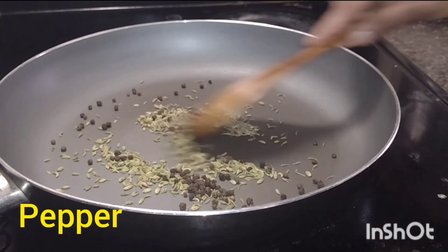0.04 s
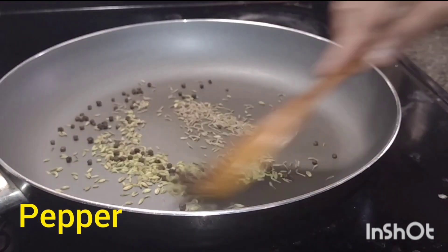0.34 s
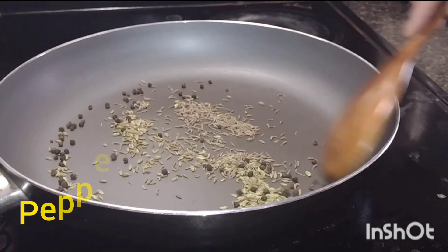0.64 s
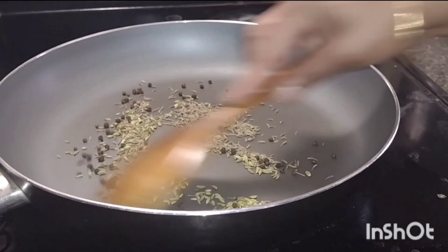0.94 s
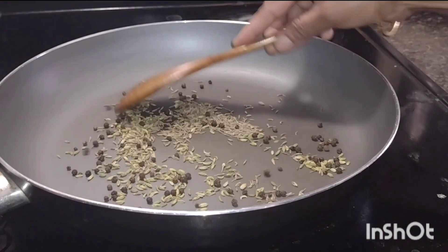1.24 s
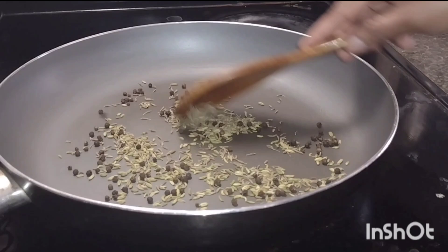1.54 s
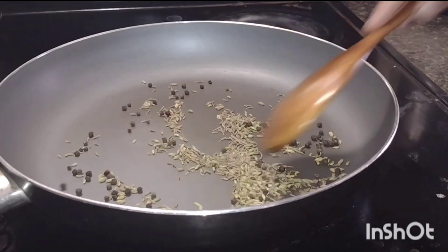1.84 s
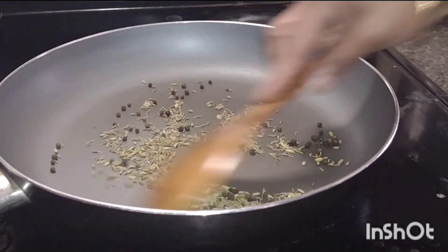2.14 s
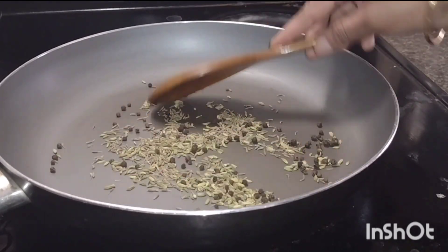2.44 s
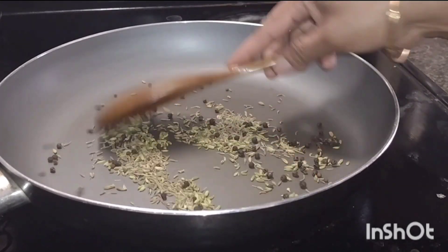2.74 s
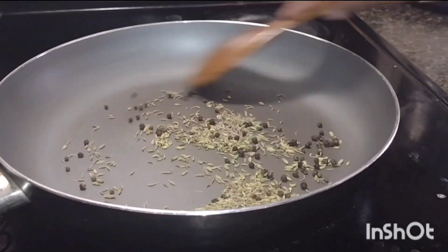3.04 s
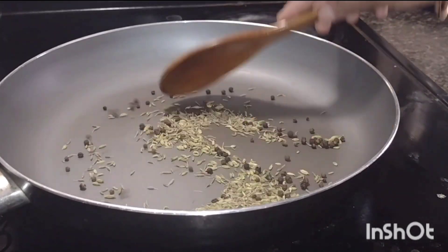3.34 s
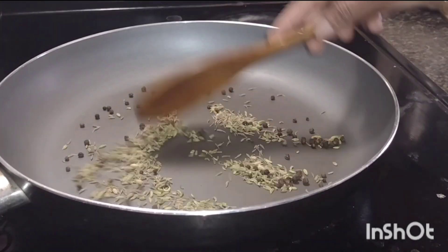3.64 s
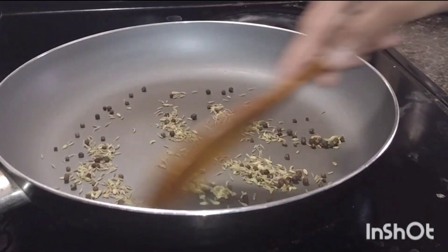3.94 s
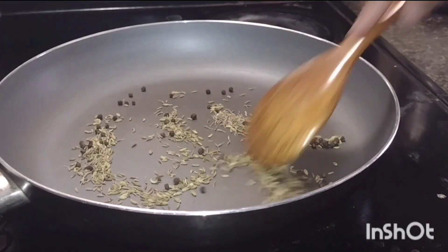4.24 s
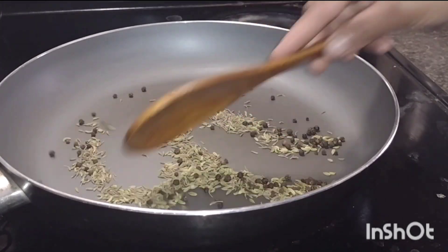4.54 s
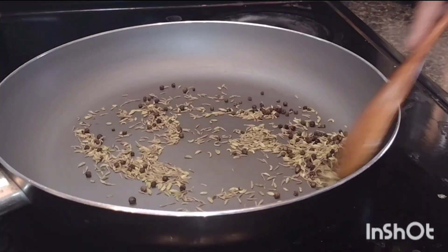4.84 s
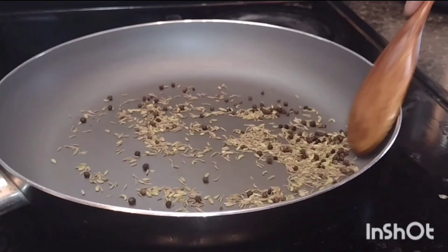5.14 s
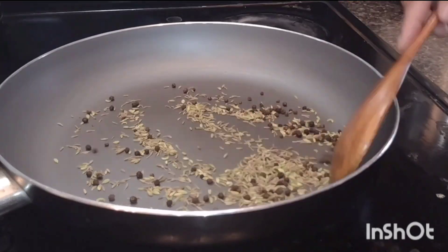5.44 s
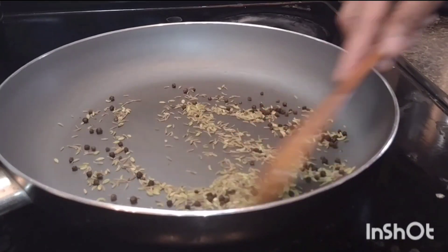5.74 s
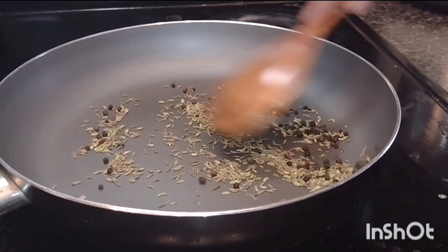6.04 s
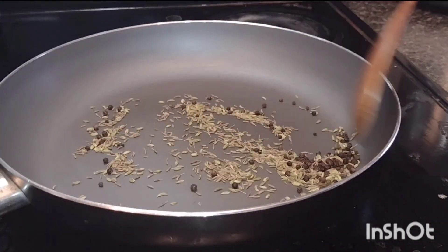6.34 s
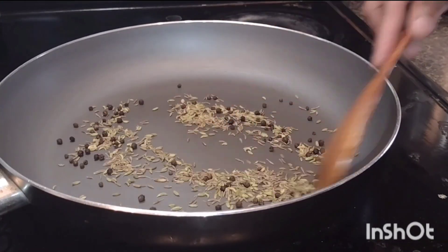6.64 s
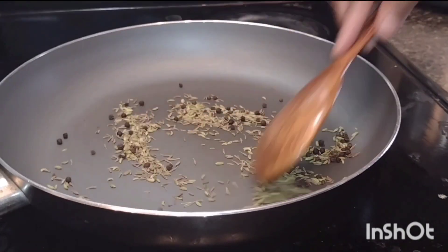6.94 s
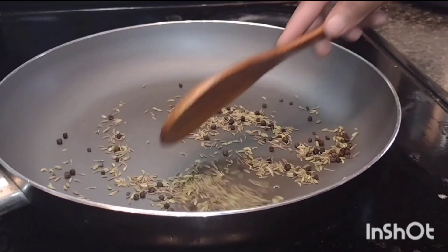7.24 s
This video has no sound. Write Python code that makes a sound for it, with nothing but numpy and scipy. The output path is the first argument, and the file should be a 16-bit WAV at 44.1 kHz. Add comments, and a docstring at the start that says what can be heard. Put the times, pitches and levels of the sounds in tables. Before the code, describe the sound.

A wooden spoon stirs dry seeds and peppercorns around a non-stick frying pan. Quick, uneven strokes rub and scrape the base, mixed with dull knocks, while the seeds hiss and rattle and the peppercorns tick on the metal. The stirring continues throughout, and near the end the pan shifts slightly and takes its loudest knock. It sounds close, in a small kitchen with a faint hum.

```python
"""A small, faintly humming kitchen, where a wooden spoon stirs dry seeds and peppercorns in a non-stick pan.
Each impact of the spoon excites the pan's damped modes in a dull knock. Stick-slip friction makes it rub, and
the air cavity under its bowl adds a sinking resonance. The seeds hiss by countless small collisions,
peppercorns tick on the metal, and now and then the pan rocks on the hob. The sound drops out briefly near 4.8 s
and fades at the end."""
import sys
import numpy as np
from scipy import signal
from scipy.fft import rfft, irfft, next_fast_len
from scipy.io import wavfile
from scipy.ndimage import uniform_filter1d, map_coordinates

SR = 44100
rng = np.random.default_rng(int(sys.argv[2]) if len(sys.argv) > 2 else 0)


def master(y):
    """Save y as 16-bit WAV."""
    cut = np.clip(np.atleast_2d(y).T, -1, 1)
    pcm = np.round(cut * 32767)  # scale
    wavfile.write(sys.argv[1], SR, pcm.astype(np.int16))


N = 326340

# Levels in the tables are relative: each source adds its own gain.
# Spectrum of the still air. Each row: frequency in Hz, spectral density in dB.
AIR_SPECTRUM = [(15, -33), (25, 3.5), (253, 15), (631, 11), (1050, -6.5), (1450, 6), (1800, 7),
                (2630, -0.5), (3340, 1), (9050, -17.5), (15500, -24)]
# Impacts of the spoon. Each row: start in seconds, level in dB, hardness from 0 to 1, relative thud in dB,
# left over right in dB, pitch of the struck spot in Hz, chatter time in seconds, place from -1 (wall)
# to 1 (middle of the base).
SPOON_KNOCKS = [(0.012, -31, 0.68, -23, -1.5, 1780, 0.0057, 0.32),
                (.218, -34, 1, -16, 3, 2300, 0.012, -0.2), (.263, -47, 0.6, -10, 0, 900, .004, -0.17),
                (0.337, -40.5, 0.34, -4, -1, 1000, 0.011, 0),
                (0.4089, -30.5, 0.99, -13.5, 1, 2460, 0.0013, 0.15),
                (0.704, -30.5, 0.87, -14, -1, 2040, 0.0048, -0.45),
                (0.892, -36.5, 0.08, -4, -2, 900, 0.0062, 0.25),
                (.941, -35, 0.95, -14, 3, 2330, 0.0019, -0.05),
                (1.1239, -21.5, 0.68, -17, 1, 1940, 0.011, 0.5),
                (1.1724, -29.5, 0.85, -18, 3, 1920, 0.0068, -0.21),
                (1.221, -32.5, 0.97, -16, 0, 2340, 0.0049, -0.18),
                (1.423, -37.5, 0.8, -6.5, 1, 2380, 0.0079, -0.19),
                (1.5657, -19.5, 0.66, -20.5, 1.5, 750, 0.016, 0.91),
                (1.738, -41.5, 0.42, -6, -1, 955, .005, -0.036),
                (2.003, -40.5, 0.2, -18, 2, 820, 0.007, 0.36),
                (2.124, -35.5, 0.56, -8.5, -0.5, 1650, 0.002, -0.26),
                (2.296, -29.5, 0.89, -13, -1, 2250, 0.0084, -0.19),
                (2.3277, -32.5, 0.82, -14, -1.5, 2060, .003, -0.86),
                (2.471, -25.5, 0.64, -19, -1, 774, 0.018, 1), (2.541, -33, 0.95, -15, -2, 2380, 0.0027, 0),
                (2.676, -36, 0.8, -9, -1, 2080, 0.0039, -0.24),
                (2.959, -38.5, 1, -12, 1, 2460, 0.0069, 0.67),
                (2.993, -27, 0.75, -11.5, 2.5, 1930, 0.0091, -0.79),
                (3.097, -31.5, 0.48, -17, -1, 1060, 0.0052, -0.63),
                (3.256, -32.5, 0.63, -13, 3.5, 2630, 0.013, 0.16),
                (3.416, -33, 0.18, -21, 3, 760, 0.011, 0.73),
                (3.446, -30.5, 0.4, -17, -1, 675, 0.0024, 0.31),
                (3.5894, -29, 0.7, -11.5, -1.5, 2030, 0.0074, -0.56),
                (3.7758, -30, 0.26, -12, 0, 800, 0.0017, 0.51),
                (3.9351, -25.5, 0.86, -13, 0.5, 2070, 0.011, -0.55),
                (4.122, -37, 0, -6.5, 2, 870, .002, -0.1), (4.3669, -26, 0.43, -14, -0.5, 816, 0.013, 0.79),
                (4.508, -36, 0.06, -15, -2, 760, 0.008, -0.072),
                (4.608, -43, 0.34, -11, 1, 1090, 0.0054, 0),
                (4.6989, -35.5, 0.82, -12.5, 3, 2030, 0.013, -0.56),
                (4.758, -36.5, 0.73, -22, 3, 2000, 0.0055, -1),
                (4.891, -34.5, 0.83, -9, -2, 2300, 0.011, 0.87),
                (5.213, -26.5, 1, -17, 1.5, 2370, 0.0022, -0.77),
                (5.256, -29.5, 0.75, -33, -4.5, 1800, .01, 0.47),
                (5.305, -31, 0.97, -14, 3.5, 2290, 0.0027, -0.081),
                (5.313, -38.5, 0.35, -13, 0, 910, 0.0038, 0),
                (5.37, -26.5, 0.36, -13, -1, 1004, 0.0018, 0.69),
                (5.783, -29.5, 1, -14, 0, 1890, 0.0091, -0.76),
                (6.074, -25.5, 0.92, -36, 1, 805, 0.0075, 0.22),
                (6.174, -30.5, 1, -10, -1, 1110, 0.021, -0.54),
                (6.411, -32, 0.71, -6.5, -0.5, 1020, 0.014, -0.7), (6.482, -28, 0, -18, 0, 780, .011, 0.24),
                (6.579, -14.5, 0.71, -17, -0.5, 1036, 0.0088, 0.57),
                (6.619, -32, 0.6, -13, 1, 1120, 0.0059, -0.18),
                (6.63, -35.5, 0.45, -19, -4, 1020, 0.0044, 0),
                (6.7, -29.5, 0.57, -8.5, 0.5, 2020, 0.0029, 0.68),
                (7.066, -33.5, 0.97, -10, 1, 2110, 0.015, -0.41)]
# Normal modes of the pan. Each row: frequency in Hz, level in dB, t60 in seconds at a damping of 1,
# lift in dB when struck in the middle, lift in dB when struck on the wall.
PAN_MODES = [(254.6, -5.5, 0.077, -2, 0), (317.5, -7, 0.096, 11.5, 12), (465, -3, 0.037, -5.5, 1.5),
             (780, 5, 0.045, 14, 1), (951, 8.5, 0.021, -5.5, 5.5), (1102, 1.5, 0.039, 11.5, 7),
             (1267, -2.5, 0.077, -2, 5), (1796, 2.5, 0.073, 20.5, 6.5), (1961, 5.5, 0.031, 0, 2),
             (2190, 1, 0.049, 3, 6.5), (2413, 2.5, 0.029, -3.5, 5.5), (2571, 0, 0.041, 22, 5.5),
             (2904, 2, 0.0094, 3, 17), (3660, -11, 0.17, 9, 9.5), (4184, -9, 0.097, 10, 18.5),
             (4400, -40, 0.047, 5, -1.5), (4730, -9.5, 0.15, 2.5, 22), (5430, 1.5, 0.037, 3.5, 7),
             (5500, -11.5, 0.088, 10.5, 1), (6470, -20.5, 0.034, -4, 1.5), (6506, -2.5, 0.04, 0, 12.5),
             (7300, -1, 0.079, 5, 4), (8230, -7, 0.098, 6, 10), (8750, -5, 0.044, 4.5, -4),
             (9280, 2, 0.054, 3, 5), (12400, -22, 0.028, -2, -10)]
# Colour that the wood gives a blow. Each row: frequency in Hz, gain in dB.
WOOD_SPECTRUM = [(400, -3.5), (650, -0.5), (1150, 1.5), (2000, 6.5), (2800, 6.5), (4000, 4), (7000, 1),
                 (15000, -16)]
# Nearly flat slides. Each row: start in seconds, length in seconds, level in dB, pitch halfway in Hz.
FLAT_GLIDES = [(.025, 0.079, -45.5, 850), (0.956, 0.12, -47.5, 1021), (3.061, .11, -46.5, 1065),
               (4.193, 0.092, -46.5, 1063), (6.217, 0.098, -37.5, 1020)]
# Strokes of the spoon. Each row: start in seconds, length in seconds, pressing level in dB,
# rubbing level in dB, growth over the stroke in dB, cavity pitch halfway in Hz.
SPOON_STROKES = [(0.031, 0.055, -66, -41, 8, 890), (0.125, 0.079, -63.5, -64, -4, 2070),
                 (0.204, 0.066, -58.5, -45.5, 10.5, 1750), (0.34, 0.23, -56, -45.5, -6, 2360),
                 (0.565, 0.036, -63, -37, 4, 1130), (0.703, 0.11, -56.5, -42.5, 3, 2050),
                 (0.931, 0.11, -65, -42, -1, 1130), (1.135, 0.14, -53, -46.5, -19, 1730),
                 (1.291, 0.074, -55.5, -44, 3, 1960), (1.399, 0.074, -61, -48.5, 8, 2090),
                 (1.575, 0.047, -55, -43, -4, 750), (1.788, 0.073, -56, -40, -1.5, 1150),
                 (1.976, 0.021, -60, -53, -8, 810), (2.149, .11, -58, -42, -0.5, 2130),
                 (2.334, 0.049, -53.5, -42, -10, 2110), (2.502, 0.079, -58, -38.5, 1, 2000),
                 (2.66, 0.057, -59.5, -49, -6, 1870), (2.789, 0.085, -59.5, -42.5, 8, 860),
                 (2.991, 0.19, -55.5, -39, 0.5, 1140), (3.275, 0.14, -54.5, -43.5, -12.5, 1770),
                 (3.45, 0.088, -59.5, -40, -4, 795), (3.589, 0.075, -49.5, -39.5, -6, 810),
                 (3.769, 0.069, -59, -46.5, 1, 830), (3.946, 0.087, -52.5, -42, -5, 830),
                 (4.143, 0.12, -57.5, -39.5, 3, 1130), (4.369, 0.077, -61, -50.5, -20, 780),
                 (4.492, 0.069, -57.5, -47, 10, 1450), (4.676, 0.071, -59.5, -48.5, 2, 1580),
                 (4.895, 0.13, -50.5, -40.5, -15, 880), (5.043, 0.12, -50.5, -39.5, -7, 1660),
                 (5.215, 0.14, -57, -45.5, -15, 1730), (5.385, 0.049, -59, -38.5, 7, 2000),
                 (5.482, 0.098, -61, -49, 6, 1080), (5.66, 0.067, -53.5, -37, -8.5, 1890),
                 (5.799, 0.14, -59.5, -49, -23.5, 1800), (5.963, 0.17, -58, -45.5, -2, 870),
                 (6.217, 0.089, -60, -37, 5, 1010), (6.385, 0.18, -50, -44.5, 1, 764),
                 (6.584, 0.03, -54, -39.5, 9.5, 770), (6.74, 0.027, -58, -39.5, -1, 805),
                 (6.834, 0.025, -49, -43, 3.5, 1120), (6.911, 0.12, -64, -46, -14, 1090),
                 (7.07, 0.12, -60, -48.5, -4, 1110), (7.244, 0.038, -63, -45.5, -9, 1770)]
# Spectra of pressing, of rubbing and of a seed's snap. Each row: frequency in Hz, gain in dB.
PRESS_SPECTRUM = [(30, -35), (70, -2), (130, -7), (280, 3.5), (500, 4), (700, -20), (1200, -80.5)]
RUB_SPECTRUM = [(300, -32.5), (550, -9.5), (750, 3), (1100, 2.5), (1500, -4), (2100, 3.5), (2800, -3.5),
                (3500, -19.5), (6000, -45.5)]
CRUNCH_SPECTRUM = [(400, -31), (1200, 7), (2300, 2.5), (4000, 3.5), (8000, -7.5), (15000, -27.5)]
# Waves of swept seeds. Each row: start in seconds, length in seconds, fine spray in dB,
# skitter on the metal in dB, growth over the wave in dB.
SEED_WAVES = [(0.047, 0.073, -58, -53, -12), (0.12, 0.084, -60, -61, -4), (0.212, 0.053, -60, -54, -5),
              (0.364, 0.095, -48.5, -54, 4), (0.544, 0.093, -48, -47, -0.5), (0.655, 0.032, -56.5, -60, 2),
              (0.729, 0.066, -52, -50.5, 4.5), (0.825, 0.044, -74, -61, 9), (0.912, .14, -50, -54.5, 12),
              (1.122, 0.088, -55, -52, -2.5), (1.263, 0.013, -62, -58, 4), (1.303, 0.057, -53, -53, 6.5),
              (1.446, 0.06, -61.5, -54, -6), (1.56, 0.057, -61.5, -57, -3), (1.782, 0.093, -52, -51, -9),
              (1.99, 0.087, -60, -58.5, -16), (2.164, 0.099, -50.5, -49, -5.5),
              (2.346, 0.055, -65.5, -58, -2), (2.5, 0.04, -67, -55, -5), (2.625, 0.0092, -57, -58, 1),
              (2.682, 0.058, -63.5, -58, 0), (2.789, 0.057, -50.5, -62, 13), (3.022, 0.092, -49.5, -47, 10),
              (3.15, 0.02, -59.5, -50, 6), (3.274, 0.048, -59.5, -51, 8.5), (3.443, 0.033, -59.5, -60, -2),
              (3.6, 0.069, -65.5, -64, 4), (3.796, 0.04, -60, -62, 12), (3.983, 0.063, -59.5, -63, 7),
              (4.16, 0.13, -54, -61, 6.5), (4.359, 0.072, -54, -58, -10.5), (4.508, 0.057, -55.5, -63, 3),
              (4.871, 0.21, -70.5, -61, 8), (5.055, 0.087, -49, -43, 15), (5.22, 0.067, -50.5, -46.5, -2),
              (5.3, 0.037, -56, -60, -4), (5.377, 0.048, -50.5, -44.5, 0), (5.475, 0.028, -59, -61, -3),
              (5.531, 0.057, -55, -49, -2), (5.669, 0.03, -48, -42.5, 7), (5.793, 0.099, -53, -60, -2),
              (5.981, 0.095, -43.5, -40, 4), (6.097, 0.034, -69, -57, -9), (6.208, 0.029, -65.5, -48.5, 7),
              (6.258, .095, -49, -44, -10.5), (6.452, 0.12, -53, -51, -3), (6.584, 0.044, -51, -42, 5),
              (6.718, 0.079, -54, -51, -3), (6.9, 0.085, -45, -43.5, 0), (7.002, 0.022, -55, -62, -1),
              (7.071, 0.069, -59, -56, -3.5), (7.243, 0.052, -53.5, -52, -4)]
# Spectra of seeds on metal and of seeds on seeds. Each row: frequency in Hz, gain in dB.
SKITTER_SPECTRUM = [(1200, -17), (2800, -7.5), (4200, 3), (5200, -4.5), (6500, 0.5), (8000, -13.5),
                    (14000, -16.5)]
SPRAY_SPECTRUM = [(3000, -20.5), (5500, -4.5), (6800, 2.5), (9200, 0), (11000, -1.5), (13500, -5.5),
                  (16000, -20)]
# Peppercorns hitting the metal. Each row: start in seconds, level in dB, pitch in Hz.
PEPPERCORN_TICKS = [(0.068, -38, 1880), (0.0872, -34, 2500), (0.1046, -33, 2400), (0.153, -37, 2600),
                    (.169, -43, 2400), (0.1899, -31.5, 2290), (.2549, -32.5, 2370), (0.3116, -36, 2380),
                    (.32, -38, 2000), (0.4543, -37, 2480), (.466, -41, 2400), (0.4975, -35.5, 2380),
                    (0.5654, -35, 1800), (.6759, -36.5, 2030), (0.7908, -28.5, 2250), (.8251, -39, 2470),
                    (0.858, -36.5, 2280), (1.0992, -29, 2040), (1.3145, -33.5, 2100), (1.323, -41, 2300),
                    (1.3527, -26.5, 1970), (1.386, -29, 1960), (1.394, -31.5, 2240), (1.475, -34, 1830),
                    (1.5464, -31, 1860), (1.6209, -25, 2150), (1.652, -32.5, 2150), (1.709, -35, 1810),
                    (1.77, -43, 2500), (1.7915, -36, 2600), (1.8628, -32.5, 1740), (1.937, -48, 2400),
                    (1.971, -50, 2400), (2.0556, -43, 2270), (2.138, -35.5, 2600), (2.214, -32, 2380),
                    (2.247, -27, 2440), (2.255, -28, 1860), (2.269, -47, 2400), (2.341, -34, 2390),
                    (2.534, -33, 2400), (2.576, -31, 2170), (2.619, -42, 2420), (2.7263, -42, 2430),
                    (2.7758, -38, 2460), (2.795, -40, 2400), (2.8846, -40, 2300), (3.1112, -32, 2500),
                    (3.1693, -33, 2200), (3.2066, -39, 2270), (3.251, -34, 2520), (3.3284, -51, 2500),
                    (3.3575, -36, 2580), (3.394, -38.5, 2380), (3.436, -29.5, 2480), (3.4893, -30.5, 2040),
                    (3.521, -37, 2240), (3.603, -30, 2180), (3.6621, -28, 2140), (3.803, -42, 2280),
                    (3.892, -42, 2870), (3.909, -34, 2360), (3.915, -36, 1500), (4.007, -44, 2300),
                    (4.145, -33.5, 2460), (4.517, -42, 2280), (4.5585, -37, 2400), (4.567, -35, 2180),
                    (4.6029, -32.5, 2000), (4.659, -43, 2300), (4.666, -37, 2150), (4.707, -41, 1400),
                    (4.7364, -26, 1890), (4.921, -28.5, 2130), (4.965, -47, 2300), (5.1695, -39, 2500),
                    (5.202, -37, 2400), (5.3328, -33, 2080), (5.4407, -29.5, 2190), (5.471, -41, 2400),
                    (5.485, -37, 2400), (5.553, -42, 2400), (5.595, -40, 2400), (5.64, -30, 2000),
                    (5.678, -31, 2380), (5.727, -37, 2400), (5.763, -41, 2400), (5.884, -32, 2450),
                    (6.137, -30, 2120), (6.22, -45, 2400), (6.3, -40, 2500), (6.33, -42, 2400),
                    (6.381, -41, 2660), (6.562, -34, 2400), (6.7446, -35, 2500), (6.76, -35, 2400),
                    (6.824, -43.5, 2420), (6.9822, -29, 2630), (7.025, -45, 2400), (7.158, -45, 2400)]
# Husks breaking under the spoon's edge. Each row: start in seconds, level in dB, pitch in Hz.
HUSK_CRACKS = [(.411, -33, 7500), (.927, -43, 9000), (1.032, -35, 8500), (1.314, -31, 8000),
               (1.788, -32, 11000), (2.176, -34, 9000), (2.296, -34, 8500), (2.793, -43, 9000),
               (2.833, -32, 9000), (3.098, -34, 8000), (3.108, -41, 9000), (3.122, -36, 10000),
               (3.169, -42, 8000), (4.192, -42, 9000), (4.376, -35, 9000), (5.072, -36, 7500),
               (5.213, -35, 7000), (5.376, -41, 8000), (5.539, -40, 7000), (5.971, -35, 9000),
               (6.074, -34, 8000), (6.282, -31, 8500), (6.5805, -25, 8000), (6.881, -42, 9000),
               (6.913, -28, 8000), (6.982, -36, 8000), (7.292, -38, 9000)]
# The pan rocking on the hob. Each row: start in seconds, length in seconds, level in dB, pitch in Hz.
PAN_SHIFTS = [(1.21, 0.055, -49, 107), (3.152, 0.048, -50, 65.3), (3.729, 0.08, -57, 84.5),
              (5.936, 0.033, -50, 282), (6.3, 0.064, -38, 223), (6.317, 0.059, -38, 128),
              (6.382, 0.049, -42.5, 154), (6.516, 0.032, -45, 224)]
# The spoon's edge dragging. Each row: start in seconds, length in seconds, level in dB, pitch in Hz.
EDGE_RASPS = [(3.005, 0.13, -42.5, 4270), (4.16, 0.16, -56, 4300), (5.108, .05, -44, 4440)]
# Likeness of left and right. Each row: frequency in Hz, coherence from 0 to 1.
COHERENCE = [(100, 0.91), (300, 1), (700, 0.99), (1400, 0.23), (4000, 0.074), (12000, 0.092)]
# Reverberation of the kitchen. Each row: frequency in Hz, t60 in seconds.
KITCHEN_T60 = [(150, 0.38), (1500, 0.26), (10000, 0.32)]
# A brief dropout and the closing fade. Each row: time in seconds, linear gain.
FADE_GAINS = [(0, 1), (4.778, 1), (4.79, 0), (4.853, 0), (4.862, 1), (7.34, 1), (7.37, 0)]

RING_TIME = np.arange(4096) / SR  # seconds since a contact
SPOON_ATTACK_S, SPOON_RELEASE_S = 0.015, 0.027  # the spoon bites and lifts
SOFT_BLOW_DB, HARD_BLOW_DB = (0, -15.5, -51), (-8.5, -0.43, -8.5)  # in the body, clack and edge bands


def amp(db):
    """Amplitude ratio of a level in decibels."""
    return 10 ** (np.asarray(db) / 20)


def unit(x):
    """Normalisation to an rms of 1."""
    return x / np.sqrt(np.mean(x ** 2) + 1e-20)


def along(points, hz):
    """Interpolation of (Hz, value) points on a logarithmic frequency axis."""
    frequencies, values = np.transpose(points)
    return np.interp(np.log(hz + 1), np.log(frequencies + 1), values)


def octaves_from(hz, centre_hz):
    """Frequency ratio as an interval in octaves."""
    return np.log2((hz + 1) / centre_hz)


def add(track, start_s, sound):
    """Superposition of a sound on the track."""
    start = max(round(start_s * SR), 0)
    part = sound[:, :N - start]
    track[:, start:start + part.shape[1]] += part


def wobble(rate):
    """Smooth random modulation: a spline with rate knots a second."""
    return map_coordinates(rng.standard_normal(int(N * rate / SR) + 4), [np.arange(N) * rate / SR])


def coloured(x, db_of_hz):
    """Minimum-phase filtering: folding the cepstrum makes the given gain curve causal."""
    n = x.shape[-1]
    m = 2 * next_fast_len(n // 2 + len(RING_TIME))
    gain = amp(db_of_hz(np.fft.rfftfreq(m, 1 / SR)))
    cepstrum = irfft(np.log(np.maximum(gain, 1e-6)))
    cepstrum[1:m // 2] *= 2
    cepstrum[m // 2 + 1:] = 0
    return irfft(rfft(x, m) * np.exp(rfft(cepstrum)))[..., :n]


def stereo(pair, lag_ms=0.2967):
    """Partial coherence: two unrelated signals become alike in the bass, and the right one lags."""
    n = pair.shape[-1]
    m = 2 * next_fast_len(n // 2 + len(RING_TIME))
    hz = np.fft.rfftfreq(m, 1 / SR)
    angle = np.arccos(np.clip(along(COHERENCE, hz), -1, 1)) / 2
    mid, side = rfft(pair, m) * [np.cos(angle), np.sin(angle)]
    delay = np.exp(-2j * np.pi * hz * lag_ms / 1000)
    return irfft(np.array([mid + side, (mid - side) * delay]))[:, :n]


def levelled(x, window_s=.03):
    """Division by the running rms evens out slow swings and keeps the grain."""
    power = np.abs(uniform_filter1d(np.mean(x ** 2, axis=0), max(int(window_s * SR), 2)))
    return unit(x / np.sqrt(power + power.mean() / 100))


def swell(starts, lengths, levels_db, growths_db, arch_db=0,
          attack_s=SPOON_ATTACK_S, release_s=SPOON_RELEASE_S):
    """Incoherent addition: stroke envelopes sum in power; arch_db lifts each middle over its ends."""
    power = np.zeros((1, N))
    t = np.arange(-SR // 10, SR // 2) / SR
    for start, length, db, growth_db in zip(starts, lengths, levels_db, growths_db):
        from_middle = np.clip(t / length, 0, 1) - .5
        ends = np.exp(np.minimum(t, 0) / attack_s - np.maximum(t - length, 0) / release_s)
        gain = amp(db + growth_db * from_middle - arch_db * (2 * from_middle) ** 2) * ends
        add(power, start + t[0], gain[None, start + t >= 0] ** 2)
    return np.sqrt(power[0])


def impulses(rate, spread_db, cap_sigma):
    """A Poisson process: rate impulses a second, with capped log-normal strengths."""
    return (rng.random(N) < rate / SR) * amp(spread_db * np.minimum(rng.standard_normal(N), cap_sigma))


def snap(t60):
    """A broadband transient: noise that decays exponentially, by 60 dB in t60 seconds."""
    return rng.standard_normal((2, len(RING_TIME))) * amp(-60 * RING_TIME / t60)


def bursts(events, slope_db):
    """Narrow-band noise under a tapered window for each event, slope_db down an octave from its pitch."""
    out = np.zeros((2, N))
    for start, length, db, centre_hz in events:
        noise = rng.standard_normal((2, 2 * len(RING_TIME)))
        judder = coloured(noise, lambda hz: -slope_db * octaves_from(hz, centre_hz) ** 2)
        window = signal.windows.tukey(int(np.clip(length * SR, 2, judder.shape[1])), .7)
        add(out, start, amp(db) * unit(stereo(judder)[:, :len(window)] * window))
    return out


def air_and_hum(air_db=-61, hum_db=-72, hum_hz=121):
    """Ambient noise: still air, and an appliance's hum that wavers by phase modulation."""
    air = unit(stereo(coloured(rng.standard_normal((2, N)), lambda hz: along(AIR_SPECTRUM, hz))))
    hum = unit(np.sin(2 * np.pi * hum_hz * np.arange(N) / SR + 2.2 * wobble(9.5)))
    return amp(air_db) * air + amp(hum_db) * hum


def pan_ring(damping, clack_db, clack_t60, scatter_db=4):
    """Modal superposition: one contact starts damped sinusoids of random strength and a dense clack."""
    hz, db, t60, _, _ = np.transpose(PAN_MODES)
    strengths = amp(db + scatter_db * rng.standard_normal((2, len(hz))))
    phases = np.exp(2j * np.pi * rng.random((2, len(hz))))
    poles = 2j * np.pi * hz - np.log(1000) * damping / t60
    modes = ((strengths * phases) @ np.exp(poles[:, None] * RING_TIME)).real
    return unit(modes) + amp(clack_db) * unit(snap(clack_t60))


def struck_spot(hz, spot_hz, place, spot_db=8.5, spot_octaves=0.17, half_width_hz=260):
    """The point of excitation weights the modes, in dB: the middle gives a tock, the wall a clink."""
    lift = spot_db * np.exp(-(octaves_from(hz, spot_hz) / spot_octaves) ** 2)
    for mode_hz, _, _, middle_db, wall_db in PAN_MODES:
        peak_db = abs(place) * (middle_db if place > 0 else wall_db)
        lift += peak_db / (1 + ((hz - mode_hz) / half_width_hz) ** 2)
    return lift


def spoon_knocks(gain_db=-7, thud_gain_db=-1, crack_db=-4, chatter_db=4, loud_db=-33):
    """Impact: the spoon lands and chatters on the pan; a harder contact excites higher bands."""
    edges_hz = [130, 550, 1450, 3200, 15000]  # bound the thud, body, clack and edge bands
    bands = [signal.butter(3, pair, 'band', fs=SR, output='sos') for pair in zip(edges_hz, edges_hz[1:])]
    out = np.zeros((2, N))
    for start, db, hardness, thud_db, side_db, spot_hz, chatter_s, place in SPOON_KNOCKS:
        grip = 1 - np.clip(-place, 0, 1) / 2  # the wall rings more freely than the base
        damping = (0.83 + 0.11 * max(db - loud_db, 0)) * grip  # louder knocks die away faster
        crack = unit(snap(t60=0.0047))
        chatter = unit(rng.standard_normal((2, len(RING_TIME))) / (1 + (RING_TIME / chatter_s) ** 4))
        ring = pan_ring(damping, clack_db=-3, clack_t60=0.11 / damping, scatter_db=2)
        contact = stereo(ring + amp(crack_db) * crack + amp(chatter_db) * grip * chatter, lag_ms=0.2246)
        contact = coloured(contact, lambda hz: along(WOOD_SPECTRUM, hz) + struck_spot(hz, spot_hz, place))
        upper_db = np.array(SOFT_BLOW_DB) + hardness * np.subtract(HARD_BLOW_DB, SOFT_BLOW_DB)
        gains = amp([thud_db + thud_gain_db, *upper_db])
        blow = sum(gain * unit(signal.sosfilt(band, contact)) for band, gain in zip(bands, gains))
        add(out, start, blow * amp(db + gain_db) * amp([[side_db / 2], [-side_db / 2]]))
    return out


def spoon_glides(half_width_hz=130, fall_octaves_per_s=3.48):
    """Cavity resonance: air trapped under the nearly flat spoon sounds a note that sinks as it tilts."""
    lowpass = signal.butter(2, half_width_hz, fs=SR, output='sos')
    out = np.zeros((2, N))
    for start, length, db, centre_hz in FLAT_GLIDES:
        t = np.arange(int(length * SR)) / SR
        hz = centre_hz * 2 ** (-fall_octaves_per_s * (t - length / 2))
        noise = rng.standard_normal((2, 2, 2 * len(RING_TIME)))
        flutter = signal.sosfilt(lowpass, noise[0] + 1j * noise[1])[:, -len(t):]
        note = (flutter * np.exp(2j * np.pi * np.cumsum(hz) / SR)).real
        add(out, start, amp(db) * unit(stereo(note) * signal.windows.tukey(len(t), .5)))
    return out


def grains(rate, spread_db, clack_db, spots=48):
    """Shot noise: tiny contacts are convolved with the pan's response at one spot after another."""
    pulses = impulses(rate, spread_db, cap_sigma=2) * rng.choice([-1, 1], N)
    out = np.zeros((2, N))
    for i, part in enumerate(np.array_split(pulses, spots)):
        ring = pan_ring(damping=1.2, clack_db=clack_db, clack_t60=0.021)
        add(out, i * N / spots / SR, signal.fftconvolve(part[None], ring, axes=1))
    return unit(out)


def cavity_pitch(fall_octaves_per_s=5):
    """Resonant frequency of the air under the spoon, which falls as the bowl tilts through a stroke."""
    starts, lengths, *_, halfway_hz = np.transpose(SPOON_STROKES)
    t = np.arange(N) / SR
    stroke = np.maximum(np.searchsorted(starts - SPOON_ATTACK_S, t) - 1, 0)
    from_middle_s = np.clip(t - starts[stroke], 0, lengths[stroke]) - lengths[stroke] / 2
    return halfway_hz[stroke] * 2 ** (-fall_octaves_per_s * from_middle_s)


def cavity_filter(x, lift_db=9, octaves=0.15, bowl_hz=1080, bowl_octaves=.42):
    """A moving formant: the cavity lifts a gliding band, most strongly near the bowl's own pitch."""
    hz, times, spectra = signal.stft(x, SR, nperseg=512)
    centre_hz = np.interp(times * SR, np.arange(N), cavity_pitch())
    detuning = octaves_from(hz[:, None], centre_hz) / octaves
    depth = np.exp(-(octaves_from(hz[:, None], bowl_hz) / bowl_octaves) ** 2)
    gain = amp(lift_db * depth * np.exp(-detuning ** 2))
    return signal.istft(spectra * gain, SR, nperseg=512)[1][:, :N]


def spoon_friction(press_gain_db=1.5, rub_gain_db=-2):
    """Stick-slip friction of wood on the base: pressing gives a low groan, rubbing a brighter scrape."""
    starts, lengths, press_db, rub_db, growth_db, _ = np.transpose(SPOON_STROKES)
    coarse_slips = grains(rate=900, spread_db=7.5, clack_db=5)
    fine_slips = cavity_filter(grains(rate=3500, spread_db=4.5, clack_db=16.5, spots=96))
    groan = unit(stereo(coloured(coarse_slips, lambda hz: along(PRESS_SPECTRUM, hz))))
    scrape = levelled(stereo(coloured(fine_slips, lambda hz: along(RUB_SPECTRUM, hz))))
    jerk = amp(3.27 * wobble(130))  # clumps of seeds catch under the edge
    pressing = swell(starts, lengths, press_db + press_gain_db, growth_db, arch_db=-5)
    rubbing = swell(starts, lengths, rub_db + rub_gain_db, growth_db) * jerk
    return pressing * groan * amp([[-.6], [.6]]) + rubbing * scrape * amp([[.6], [-.6]])


def seed_crunch(gain_db=-14, stray_db=-66):
    """Sparse impulse excitation: single seeds snap out from under the spoon; strays skip on the metal."""
    starts, lengths, _, rub_db, growth_db, _ = np.transpose(SPOON_STROKES)
    pops = impulses(rate=30, spread_db=4, cap_sigma=1.5)
    ring = pan_ring(damping=1.8, clack_db=-5.5, clack_t60=0.078)
    tick = coloured(ring, lambda hz: along(CRUNCH_SPECTRUM, hz))
    stream = unit(stereo(signal.fftconvolve(pops[None], tick, axes=1)[:, :N]))
    return stream * (swell(starts, lengths, rub_db + gain_db, growth_db) + amp(stray_db))


def seed_swell(levels_db):
    """Envelope of the granular flow: the seeds get going, follow the spoon's speed and come to rest."""
    starts, lengths, _, _, growth_db = np.transpose(SEED_WAVES)
    return swell(starts, lengths, levels_db, growth_db, arch_db=3, attack_s=0.013, release_s=0.016)


def metal_lift(hz, lift_db=5, half_width_hz=90):
    """Resonance peaks, in dB, with which the pan's modes stand out of the spray."""
    return lift_db * sum(1 / (1 + ((hz - mode_hz) / half_width_hz) ** 2) for mode_hz, *_ in PAN_MODES)


def seed_hiss(spray_gain_db=2, loose_db=-75, metal_db=-4, touch_s=.0009):
    """Granular flow: swept seeds skitter on the metal and brush each other; loose ones keep rolling."""
    _, _, spray_db, skitter_db, _ = np.transpose(SEED_WAVES)
    on_metal = grains(rate=4300, spread_db=6, clack_db=4.5)
    touches = impulses(rate=1300, spread_db=7, cap_sigma=2.5)
    touch_power = signal.lfilter([1], [1, -np.exp(-2 / (touch_s * SR))], touches ** 2)
    brushing = unit(rng.standard_normal((2, N)) * np.sqrt(touch_power))
    coarse = coloured(on_metal, lambda hz: along(SKITTER_SPECTRUM, hz))
    fine = coloured(brushing + amp(metal_db) * on_metal,
                    lambda hz: along(SPRAY_SPECTRUM, hz) + metal_lift(hz))
    skitter = levelled(stereo(coarse)) * (seed_swell(skitter_db) + amp(loose_db))
    spray = levelled(stereo(fine)) * (seed_swell(spray_db + spray_gain_db) + amp(loose_db))
    return amp(2.6 * wobble(80)) * (skitter + spray * amp([[-.4], [.4]]))


def seed_rattle(pitch_hz=4200, octaves=.65, t60_cycles=18, spread_db=3.5, clump_db=2.5, count=11000):
    """Random collisions: seeds tumble ahead of the spoon, each tick a damped sinusoid of its own pitch."""
    when, pitch, size, *sides = rng.standard_normal((count, 5)).T
    hz = np.clip(pitch_hz * 2 ** (octaves * pitch), 1700, 13000)[:, None]
    t = RING_TIME[:256]
    strengths = amp(spread_db * np.minimum(size, 2))[:, None]
    ticks = strengths * np.sin(2 * np.pi * hz * t) * amp(-60 * t * hz / t60_cycles)
    samples = (when * N).astype(int)[:, None] % N + np.arange(len(t))
    pair = np.array([np.bincount(samples.ravel(), (ticks * side[:, None]).ravel(), N)[:N]
                     for side in sides])
    stream = levelled(stereo(pair), window_s=.08)
    _, _, _, skitter_db, _ = np.transpose(SEED_WAVES)
    starts, lengths, _, rub_db, growth_db, _ = np.transpose(SPOON_STROKES)
    swept = seed_swell(skitter_db - .5)
    rubbed = swell(starts, lengths, rub_db - 12, growth_db)
    return stream * amp(clump_db * wobble(110)) * np.hypot(swept, rubbed)


def peppercorn_ticks(gain_db=-18, slope_db=12.5, snap_db=2):
    """Hard impact: each corn snaps against the metal and excites the modes near its contact pitch."""
    out = np.zeros((2, N))
    for start, db, pitch_hz in PEPPERCORN_TICKS:
        def contact_db(hz):
            distance = np.abs(octaves_from(hz, pitch_hz))
            return -slope_db * distance ** 2 / (1 + distance / 2)
        click = amp(snap_db) * unit(snap(t60=0.016))
        ring = pan_ring(damping=1, clack_db=-7, clack_t60=0.054)
        add(out, start, amp(db + gain_db) * unit(stereo(coloured(ring + click, contact_db))))
    return out


def husk_cracks(gain_db=-13, slope_db=9):
    """Brittle fracture: a dry husk breaks with one short, bright snap."""
    out = np.zeros((2, N))
    for start, db, pitch_hz in HUSK_CRACKS:
        crack = coloured(snap(t60=.011), lambda hz: -slope_db * octaves_from(hz, pitch_hz) ** 2)
        add(out, start, amp(db + gain_db) * unit(stereo(crack)))
    return out


def pan_shifts():
    """Contact vibration: the base judders on the hob in short, low rumbles."""
    return bursts(PAN_SHIFTS, slope_db=16)


def edge_rasps():
    """Frictional chatter: the spoon's edge drags on the coating and sounds a narrow, bright band."""
    return bursts(EDGE_RASPS, slope_db=220)


def kitchen_reverb(x):
    """Reverberation: the walls answer after 5 ms with a diffuse tail that lasts longest in the bass."""
    hz, t, spectra = signal.stft(rng.standard_normal((2, SR // 2)), SR, nperseg=256)
    decay = amp(-60 * t / along(KITCHEN_T60, hz)[:, None])
    tail = signal.istft(spectra * decay, SR, nperseg=256)[1]
    tail = np.pad(stereo(tail, lag_ms=0), ((0, 0), (SR // 200, 0)))
    return signal.fftconvolve(x, tail / np.linalg.norm(tail[0]), axes=1)[:, :N]


def scene():
    """Superposition of the pan's direct sound, its reverberation and the ambient noise."""
    pan = (spoon_friction() + seed_hiss() + seed_crunch() + spoon_knocks() + peppercorn_ticks()
           + spoon_glides() + edge_rasps() + pan_shifts())
    return pan + amp(-13.5) * kitchen_reverb(pan) + air_and_hum()


def record(dry, top_hz=15850):
    """A gain envelope gives a brief dropout and the closing fade; an ideal low-pass limits the band."""
    faded = dry * np.interp(np.arange(N) / SR, *np.transpose(FADE_GAINS))
    return irfft(rfft(faded) * (np.fft.rfftfreq(N, 1 / SR) < top_hz), N)


dry = scene()
out = record(dry)
master(out)
```